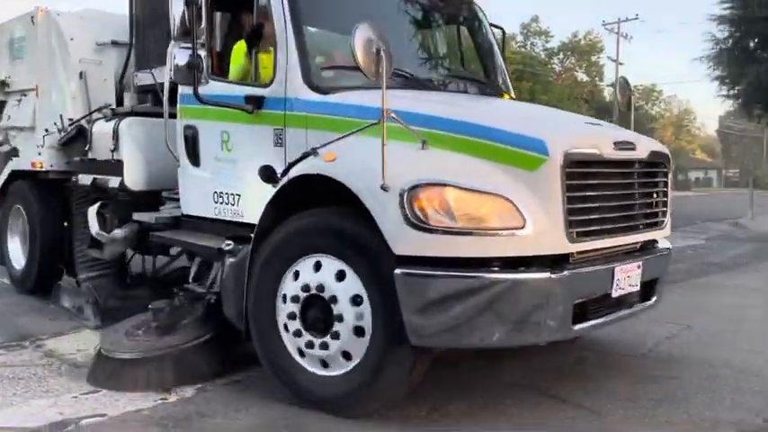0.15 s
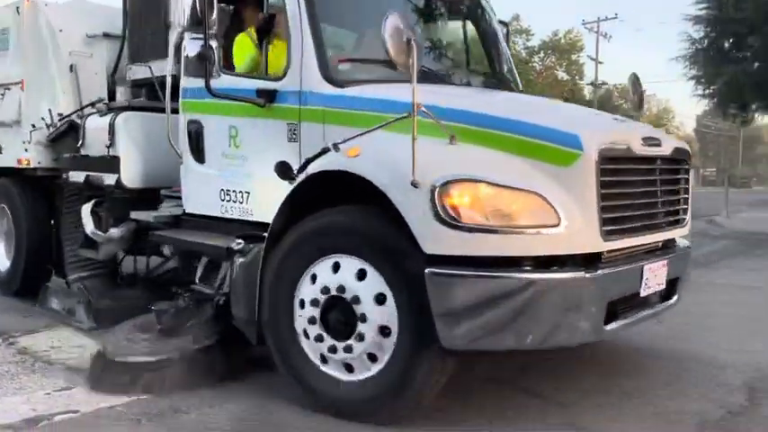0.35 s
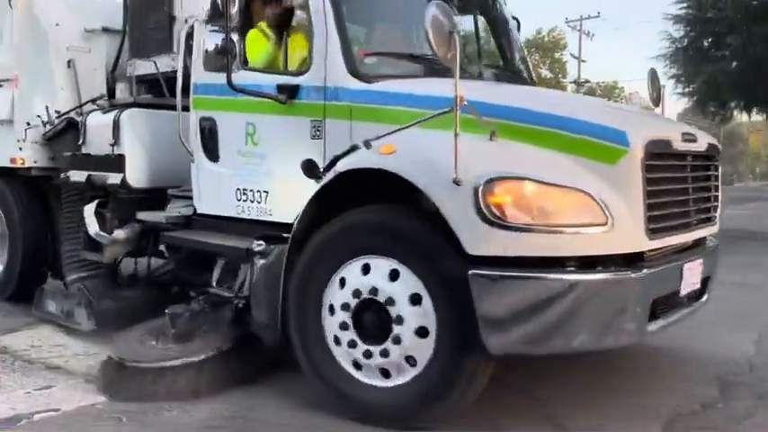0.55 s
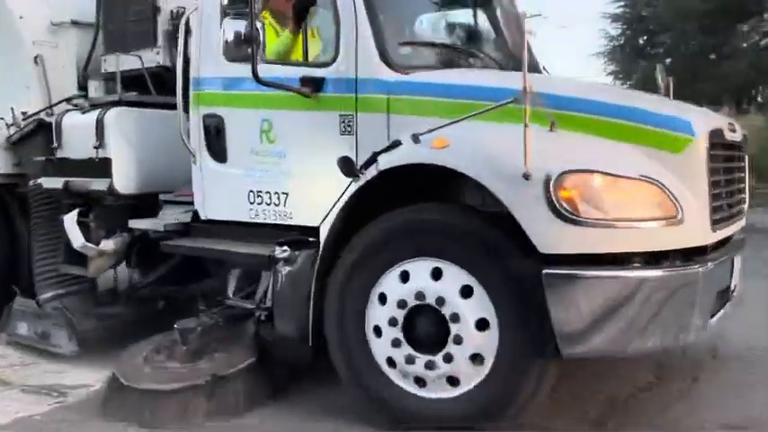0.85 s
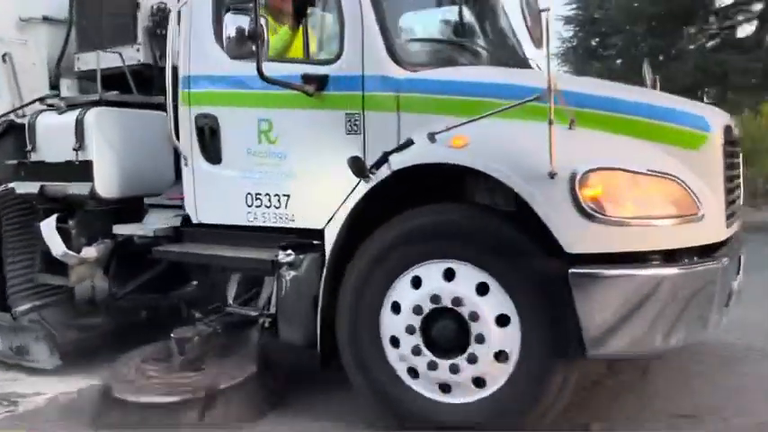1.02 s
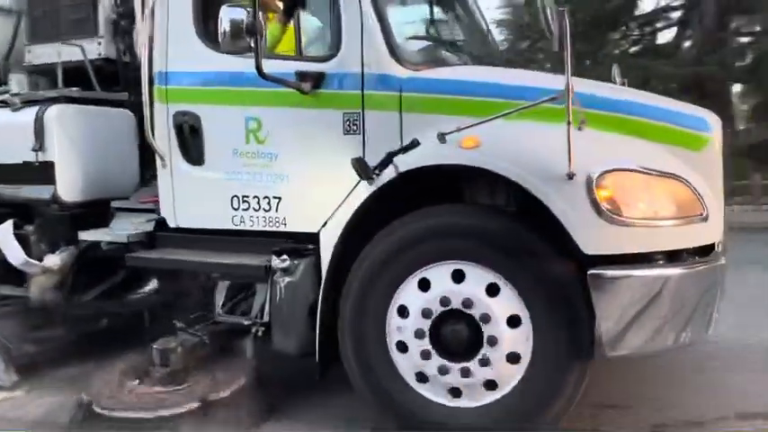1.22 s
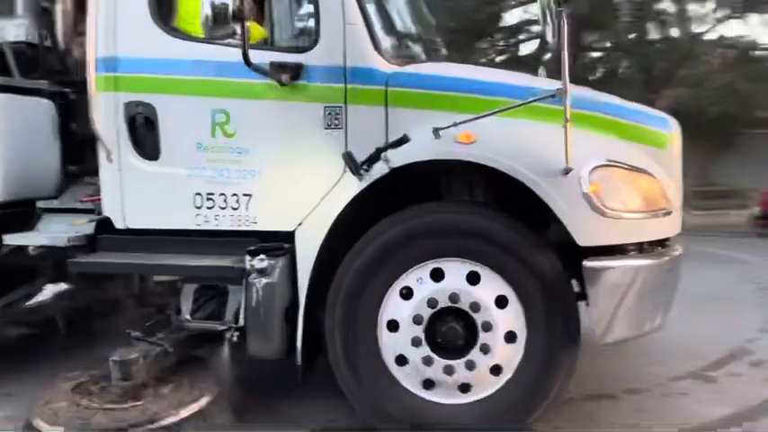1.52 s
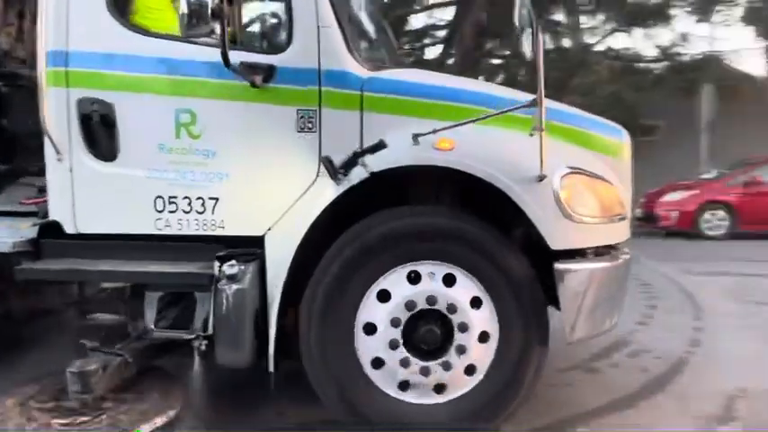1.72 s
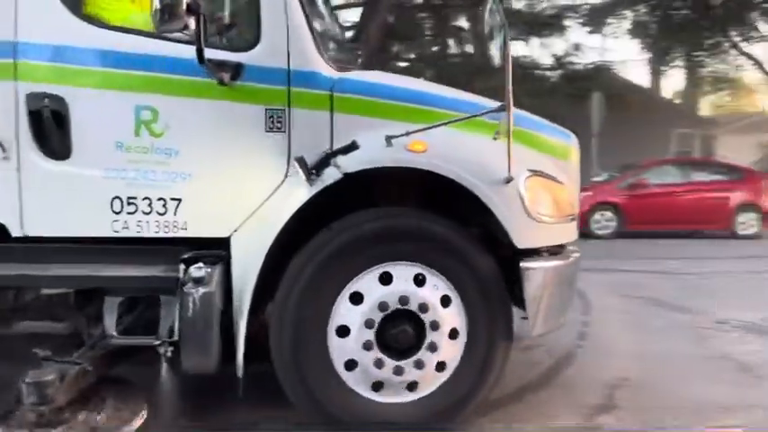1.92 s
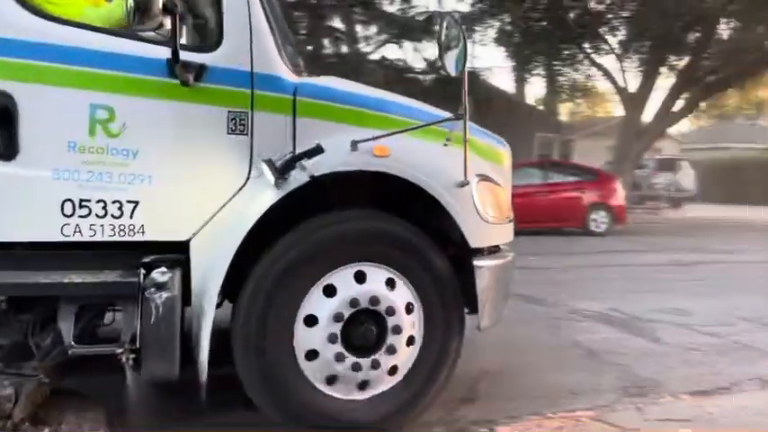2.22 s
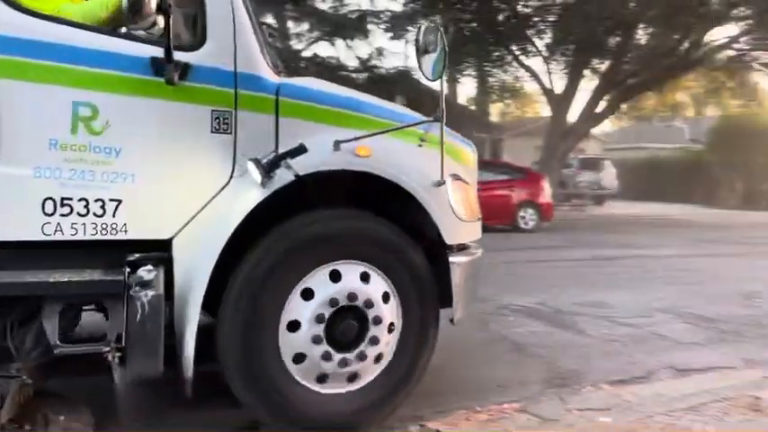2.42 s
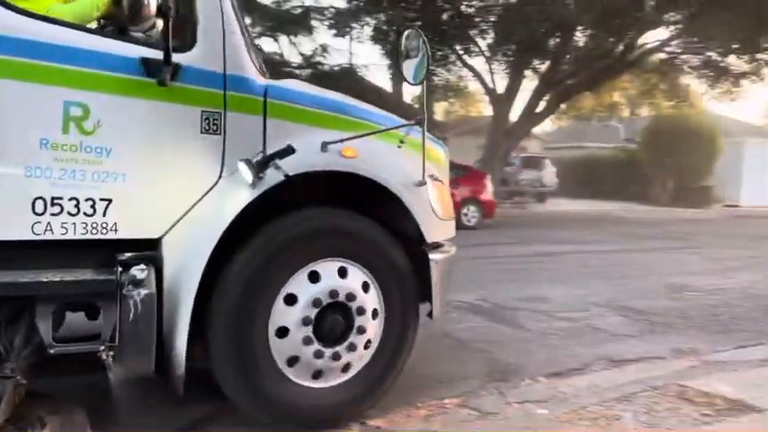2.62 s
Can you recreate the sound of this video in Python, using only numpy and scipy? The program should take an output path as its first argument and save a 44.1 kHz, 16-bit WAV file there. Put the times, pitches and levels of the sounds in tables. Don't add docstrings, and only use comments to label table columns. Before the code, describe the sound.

A street sweeper truck works past a close outdoor stereo microphone. From 0 s a clean, low fan hum dominates, strongest near 0.6 s, above diesel rumble, mid engine roar, whirring air and bright bristle hiss; body panels boom briefly around 0.5-1.1 s. From 1 s the hum sinks, faintest near 2.3 s, leaving steady rough noise, then swells slightly by 2.7 s.

```python
import sys
import numpy as np
from scipy import signal
from scipy.fft import rfft, irfft, next_fast_len
from scipy.io import wavfile
from scipy.ndimage import uniform_filter1d, map_coordinates

SR = 44100
rng = np.random.default_rng(int(sys.argv[2]) if len(sys.argv) > 2 else 0)


def gain_from_decibels(decibels):
    exponent = np.asarray(decibels, float) / 20
    return 10 ** exponent


def store_wav(level_fs):
    pcm = np.round(np.clip(np.atleast_2d(level_fs), -1, 1) * 32767)
    wavfile.write(sys.argv[1], SR, pcm.T.astype(np.int16))


N = 121275

# (time [s], blade tone [dB], second overtone [dB], engine roar [dB], brush nearness [dB],
# hood air [dB], exhaust [dB])
TRUCK_PASS = [(0.0, -17, -41, -27.5, -33, -31, -24), (0.14, -16, -37, -29.5, -29.5, -30, -27.5),
              (0.16, -15.5, -42, -29, -30, -30, -25.5), (0.4, -13.5, -31, -27.5, -28.5, -29, -23.5),
              (0.61, -12.5, -36, -27, -27, -28.5, -25), (0.97, -16, -33, -26, -25.5, -29, -24),
              (1.09, -16.5, -45.5, -28, -28, -29, -27), (1.32, -21.5, -53, -27, -27, -28.5, -27.5),
              (1.41, -24.5, -34.5, -28, -27, -30, -28), (1.66, -25.5, -34, -29.5, -28, -28.5, -29.5),
              (1.73, -27.5, -39.5, -31, -28, -30, -29), (2.3, -29.5, -32.5, -31, -30, -33, -32),
              (2.7, -25, -39, -30.5, -29.5, -32, -29.5), (2.75, -24, -36, -30, -30, -31.5, -38)]
# (multiple of blade tone [1], peak level [dB], peak time [s], width [s])
OVERTONE_LOBES = [
    (3, -32.5, .13, .22),
    (3, -42, 1.2, .9),
    (4, -38, .7, .18),
    (5, -31.5, .72, .15),
    (5, -45, 2.2, .4),
    (5, -38, .22, .1),
]
# (multiple of firing rate [1], level relative to the exhaust column of the pass [dB])
EXHAUST_ORDERS = [(1, -11.5), (2, -7.5), (3, -9)]
# (frequency [Hz], width [Hz], level [dB], peak time [s], duration [s])
PANEL_BOOMS = [
    (362, 9.3, -30.5, 0.61, 0.119),
    (272, 5.9, -29.5, 1.05, 0.38),
    (240.4, 17.5, -26.5, 0.55, 0.17),
    (867, 29, -35, 0.71, 0.17),
]
# (frequency [Hz], density [dB per Hz])
RUMBLE_SPECTRUM = [(25, -35), (37, -24), (46, -6.5), (75, -3.5), (135, -1.5), (185, -4), (360, -6),
                   (560, -11.5)]
# (frequency [Hz], density [dB per Hz])
ROAR_SPECTRUM = [(300, -3), (520, -0.5), (750, -0.5), (1200, 4), (1450, -3), (2000, -4), (2600, -10),
                 (3300, -34)]
# (frequency [Hz], density [dB per Hz])
WHIRR_SPECTRUM = [(1500, -11), (2300, 1.5), (3400, 3), (4500, 4.5), (5300, 1.5), (5600, -2.5), (6600, -3.5),
                  (7200, -25)]
# (frequency [Hz], density [dB per Hz])
HISS_SPECTRUM = [(6000, -25), (6900, -4.5), (8500, 0), (10500, -1.2), (13000, -1.3), (14800, -2.5),
                 (15200, -5), (16000, -6)]
# (frequency [Hz], phase [rad])
LEAD_ALONGSIDE = [(300, .12), (2200, .8), (2800, 4.6), (3550, 5), (3950, 6.15), (4600, 6.35), (5150, 7.3),
                  (5550, 6.2)]
# (frequency [Hz], phase [rad])
LEAD_AWAY = [(30, 0), (260, .6), (1210, 1.05), (2050, 1.7), (3050, 6.3), (4200, 6.6), (5250, 8.3),
             (5600, 5.4)]
# (frequency [Hz], phase [rad])
HISS_LEAD_ALONGSIDE = [(6400, 5.9), (6900, 5.3), (7400, 3.8), (8700, 3.14), (9700, 2.65), (11300, 1.5),
                       (11900, .6), (13000, .2)]
# (frequency [Hz], phase [rad])
HISS_LEAD_AWAY = [(6400, 5.6), (6900, 4.2), (7500, 3.9), (8800, 3.14), (10200, 2.6), (10700, 1.9),
                  (11900, .95), (12700, .3)]
# (frequency [Hz], likeness [0-1])
ALIKE_ALONGSIDE = [(60, .998), (1200, .9), (2550, .86), (3400, .5), (3950, .87), (4650, .86), (5200, .5),
                   (5550, .72)]
# (frequency [Hz], likeness [0-1])
ALIKE_TURNED_AWAY = [(60, .995), (600, .8), (1200, .9), (1700, .55), (2380, .9), (3400, .6), (4300, .68),
                     (6100, .25)]
# (frequency [Hz], likeness [0-1])
HISS_ALIKE = [(6400, .6), (7000, .35), (7600, .85), (8500, .95), (9500, .92), (10800, .66), (12200, .85),
              (13000, .93)]
# (frequency [Hz], left over right [dB])
PORT_PAN = [(60, .2), (300, 2.5), (1200, 1.5), (1500, .3), (2200, -4), (2900, .1), (5600, .2), (6500, 1.8)]

BLADE_HZ, UNSTEADY_HZ = 208.56, .4
TONE_PAN_DB, TONE_LEAD_RAD = 1.55, 0.27
SECOND_PAN_DB, SECOND_LEAD_RAD = 7, 0.32
FIRING_HZ, RUMBLE_DB = 47.62, 2.5
WHIRR_DB, HISS_DB = 3, 4.5
FLUTTER_DB = .5
TURN_S, TURN_LASTS_S = 1.84, 0.19
NOTCH_HZ, NOTCH_WIDTH_HZ, NOTCH_DB = 5610, 93, -8
TOP_HZ = 15750
HEADROOM = 1.05
LEFT_RIGHT = np.array([[1], [-1]])


def unit(x):
    return x / np.sqrt(np.mean(x ** 2) + 1e-20)


def along(points, hz):
    f, v = np.transpose(points)
    return np.interp(np.log(hz + 1), np.log(f + 1), v)


def wobble(rate):
    return map_coordinates(rng.standard_normal(200), [np.arange(N) * rate / SR])


def filtered(x, response):
    m = next_fast_len(N + 8192)
    return irfft(rfft(x, m) * response(np.fft.rfftfreq(m, 1 / SR)), m)[..., :N]


def control(index):
    rows = np.transpose(TRUCK_PASS)
    return np.interp(np.arange(N) / SR, rows[0], rows[index])


def patchy(patchy_db):
    z = signal.stft(rng.standard_normal((3, N)), nperseg=512)[2]
    field = uniform_filter1d(rng.standard_normal(z.shape[1:]), size=8, axis=0)
    field = uniform_filter1d(field, size=14, axis=1)
    return signal.istft(z * gain_from_decibels(patchy_db * unit(field)), nperseg=512)[1][:, :N]


def ports(source, spectrum, lead, alike, pan):
    def colour(hz):
        outside = (hz < spectrum[0][0]) | (hz > spectrum[-1][0])
        return gain_from_decibels(along(spectrum, hz) - 120 * outside + LEFT_RIGHT * along(pan, hz) / 2)

    def share(hz):
        return np.clip(along(alike, hz), 0, 1)

    def direct_path(hz):
        return colour(hz) * np.sqrt(share(hz)) * np.exp(.5j * LEFT_RIGHT * along(lead, hz))

    direct = filtered(source[0], direct_path)
    scattered = filtered(source[1:], lambda hz: colour(hz) * np.sqrt(1 - share(hz)))
    return unit(direct + scattered)


def turning(patchy_db, spectrum, leads=(LEAD_ALONGSIDE, LEAD_AWAY),
            alikes=(ALIKE_ALONGSIDE, ALIKE_TURNED_AWAY), pan=PORT_PAN):
    away = 1 / (1 + np.exp((TURN_S - np.arange(N) / SR) / TURN_LASTS_S))
    before = ports(patchy(patchy_db), spectrum, leads[0], alikes[0], pan)
    after = ports(patchy(patchy_db), spectrum, leads[1], alikes[1], pan)
    return np.sqrt(1 - away) * before + np.sqrt(away) * after


def exhaust():
    crank = 2 * np.pi * np.cumsum(FIRING_HZ * (1 + 0.01 * wobble(9.95))) / SR
    orders = 0
    for multiple, db in EXHAUST_ORDERS:
        level = np.sqrt(2) * gain_from_decibels(db + 0.6 * wobble(6.86))
        orders = orders + level * np.sin(round(multiple) * crank + rng.uniform(0, 5.72))
    rumble = gain_from_decibels(RUMBLE_DB + 0.44 * wobble(6.4)) * turning(1.5, RUMBLE_SPECTRUM)
    return gain_from_decibels(control(index=6)) * (orders + rumble)


def body_panels():
    t = np.arange(N) / SR
    out = 0
    for hz, width_hz, db, at, lasts in PANEL_BOOMS:
        hum = filtered(rng.standard_normal(N), lambda f: np.exp(-((f - hz) / width_hz) ** 2))
        swell = np.exp(-.5 * ((t - at) / lasts) ** 2)
        out = out + unit(hum) * gain_from_decibels(db + 1.5 * LEFT_RIGHT) * swell
    return out


def engine_bay():
    return gain_from_decibels(control(index=3) + 0.78 + 0.2 * wobble(10.13)) * turning(1.4, ROAR_SPECTRUM)


def brushes():
    whirr = turning(1.3, WHIRR_SPECTRUM)
    hiss = turning(1.3, HISS_SPECTRUM, (HISS_LEAD_ALONGSIDE, HISS_LEAD_AWAY), (HISS_ALIKE, HISS_ALIKE),
                   pan=[(6500, 1.5), (8000, .1)])
    shared, air, tufts = (FLUTTER_DB * wobble(rate) for rate in (15, 24, 28))
    whirr_level = gain_from_decibels(control(index=5) + WHIRR_DB + shared + air)
    hiss_level = gain_from_decibels(control(index=4) + HISS_DB + shared + tufts)
    return whirr_level * whirr + hiss_level * hiss


def fan():
    t, side = np.arange(N) / SR, LEFT_RIGHT / 2
    phase = 2 * np.pi * np.cumsum(BLADE_HZ + UNSTEADY_HZ * wobble(5.25)) / SR
    tone_level = gain_from_decibels(control(index=1) + 0.33 * wobble(11.25) + side * TONE_PAN_DB)
    out = tone_level * np.sin(phase + side * TONE_LEAD_RAD)
    second_level = gain_from_decibels(control(index=2) + 3.04 + 1.54 * wobble(16) + side * SECOND_PAN_DB)
    out = out + second_level * np.sin(2 * phase + 1.12 + side * SECOND_LEAD_RAD)
    for multiple, db, at, width in OVERTONE_LOBES:
        sweep = np.exp(-.5 * ((t - at) / width) ** 2)
        level = gain_from_decibels(db + 1.2 * wobble(8) + side * SECOND_PAN_DB / 2) * sweep
        out = out + level * np.sin(round(multiple) * phase + rng.uniform(0, 6) + side * SECOND_LEAD_RAD)
    return np.sqrt(2) * out


def scene():
    return exhaust() + body_panels() + engine_bay() + brushes() + fan()


def roll_off(x):
    return signal.sosfilt(signal.butter(12, 16340, fs=SR, output="sos"), x)


def record(dry):
    def microphone(hz):
        notch = gain_from_decibels(NOTCH_DB * np.exp(-((hz - NOTCH_HZ) / NOTCH_WIDTH_HZ) ** 2))
        return notch * (hz < TOP_HZ)

    rounded = dry / (1 + abs(dry / HEADROOM) ** 4) ** .25
    heard = filtered(rounded, microphone)
    return roll_off(heard)


dry = scene()
out = record(dry)
store_wav(out)
```